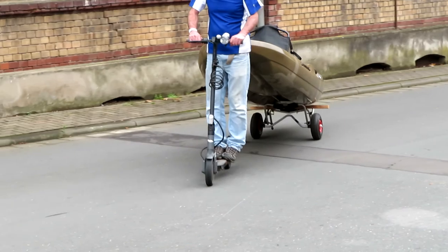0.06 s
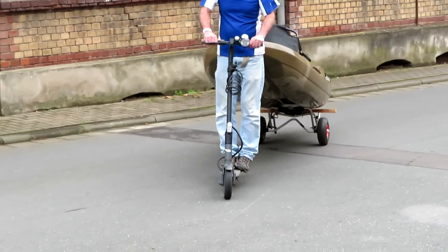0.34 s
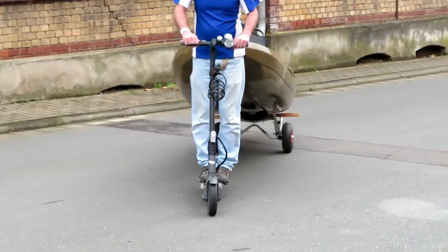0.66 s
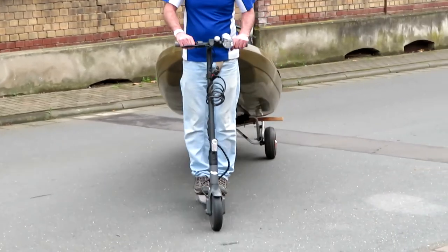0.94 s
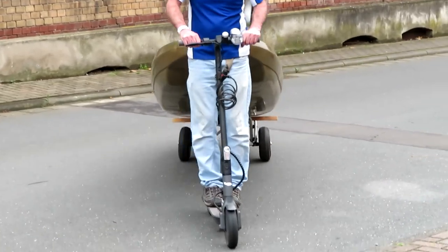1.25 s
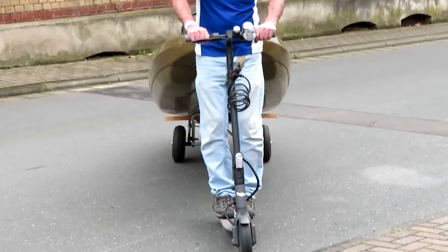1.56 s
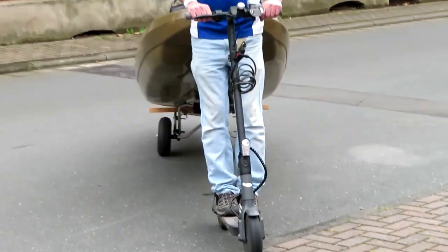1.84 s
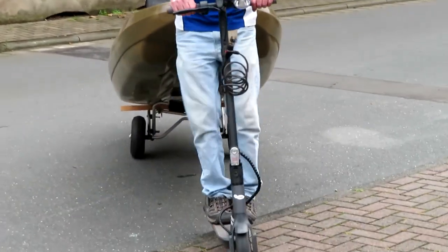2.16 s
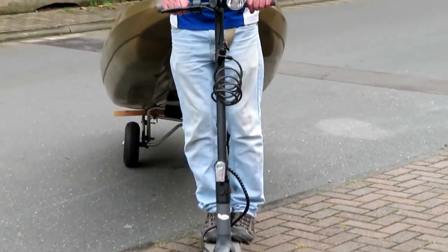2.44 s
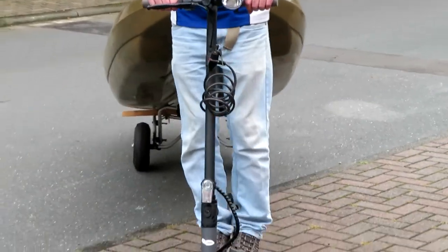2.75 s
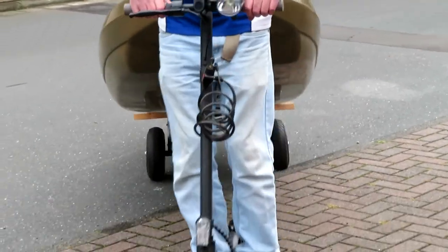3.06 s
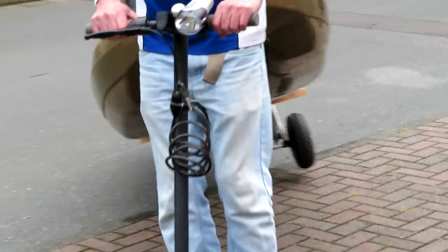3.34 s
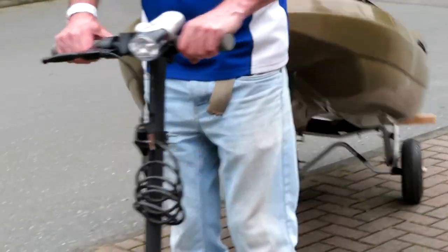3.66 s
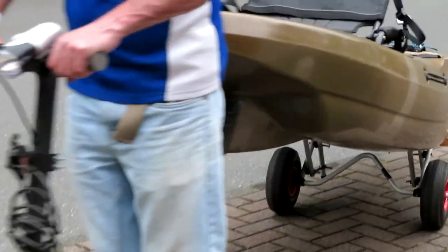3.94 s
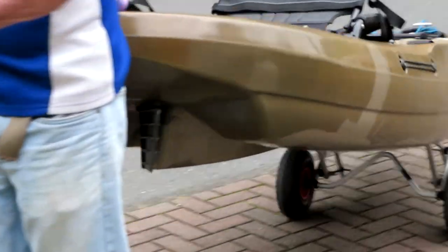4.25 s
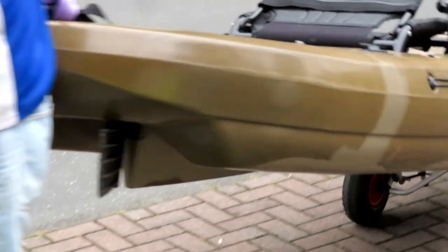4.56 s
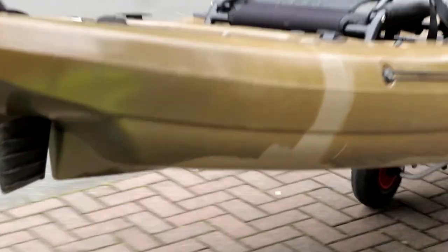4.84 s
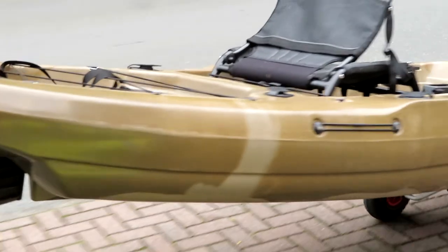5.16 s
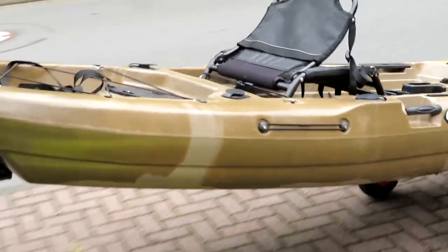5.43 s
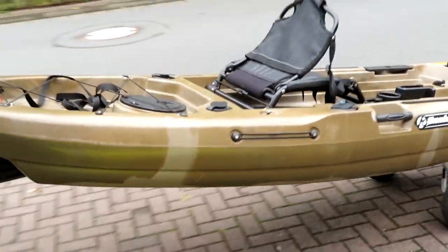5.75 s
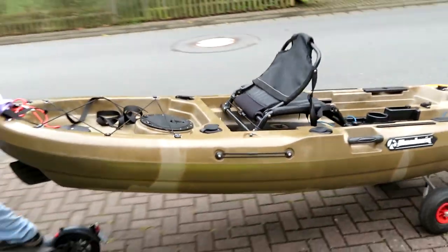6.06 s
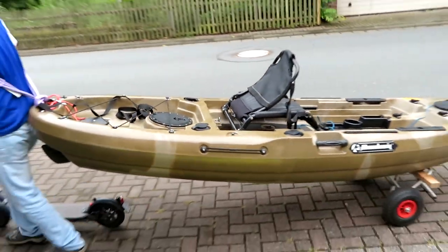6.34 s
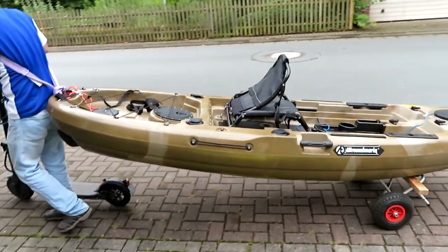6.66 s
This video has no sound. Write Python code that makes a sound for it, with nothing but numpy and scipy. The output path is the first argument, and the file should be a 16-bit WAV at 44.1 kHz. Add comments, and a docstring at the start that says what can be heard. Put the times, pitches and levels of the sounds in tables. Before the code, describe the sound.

Tyres rumble with a rhythmic rubbing tick, then a towed kayak and its cart thump and rattle loudly over a kerb and roll on slowly.

```python
"""Tyres hiss and a hollow hull drums: an electric scooter tows a plastic kayak on a two-wheeled cart.
The motor drive whines thinly, a wheel rubs on every turn, stones tick and the hitch creaks.
At a low kerb the tyres scrape and thump, the hull booms and bangs against the cart, and the cart's
crossbar knocks and its tubes clink. On block paving the rig slows to a creep, grit cracks under the
tyres, and a metal fitting snaps twice among the last knocks."""
import sys
import numpy as np
from scipy import signal
from scipy.fft import rfft, irfft, next_fast_len
from scipy.io import wavfile

SR = 44100
rng = np.random.default_rng(int(sys.argv[2]) if len(sys.argv) > 2 else 0)


def pcm_store(signal):
    """Save signal as 16-bit PCM."""
    levels = np.round(np.clip(np.atleast_2d(signal), -1, 1) * 32767)
    wavfile.write(sys.argv[1], SR, levels.astype(np.int16).T)


N = 299875
TIME = np.arange(N) / SR
BLOW_TIME = TIME[:SR // 2]
ATTACK = int(.025 * SR)  # the opening samples that set a blow's level


def from_db(db):
    """Decibels to gain."""
    return 10 ** (np.asarray(db) / 20)


def rms_one(x):
    """Scale to unit rms."""
    return x / np.sqrt(np.mean(x ** 2) + 1e-20)


def in_time(rows):
    """Each column of an automation curve at every sample."""
    s, *columns = np.transpose(rows)
    return [np.interp(TIME, s, c) for c in columns]


def gain_at(points, hz):
    """Gain of an EQ curve, read on a log-frequency axis."""
    f, db = np.transpose(points)
    return from_db(np.interp(np.log(hz + 1), np.log(f), db))


def drift(rate):
    """Random wander of rms 1 that turns about rate times a second."""
    return rms_one(np.interp(TIME * rate, np.arange(N), rng.standard_normal(N)))


# stereo width of the noises: f/Hz, side against mid/dB
STEREO_WIDTH = [(40, -82), (170, -78), (350, -23.5), (700, -30), (1400, -14), (2800, -11), (5600, -1.5),
                (10000, 0.5), (14000, 4)]
def noise(spectrum):
    """Coloured stereo noise, wider in the treble, rolled off beyond its spectrum; mid rms 1."""
    size = next_fast_len(N)
    hz = np.fft.rfftfreq(size, 1 / SR)
    skirts = 1 / (1 + (hz / spectrum[-1][0] / 2) ** 4) / (1 + (spectrum[0][0] / 2 / (hz + 1)) ** 4)
    mid, side = rfft(rng.standard_normal((2, size))) * gain_at(spectrum, hz) * skirts
    mid = irfft(mid, size)[:N]
    side = irfft(side * gain_at(STEREO_WIDTH, hz), size)[:N]
    return (mid + side * np.array([[1], [-1]])) / np.std(mid)


def patchy(x, depth_db, size, swell_share=1):
    """Random flicker: bands swell and sink on their own; a small swell_share leaves mostly dips."""
    _, s, cells = signal.stft(x, SR, nperseg=size)
    blur = np.outer([1, 2, 1], [1, 2, 1])
    field = rms_one(signal.convolve2d(rng.standard_normal(cells.shape[1:]), blur, "same"))
    depth = np.interp(s, TIME, np.broadcast_to(depth_db, N))
    gain = from_db(depth * np.minimum(field, swell_share * field))
    return signal.istft(cells * gain / np.sqrt(np.mean(gain ** 2, axis=0)), SR, nperseg=size)[1][:, :N]


def decay(t60):
    """Fade of one blow: 60 dB in t60 seconds."""
    return np.exp(-np.log(1000) * BLOW_TIME / t60)


def dying(times, db, t60):
    """Envelope of blows whose energy adds up and dies away."""
    power = np.zeros(N)
    np.add.at(power, (np.asarray(times) * SR).astype(int), from_db(db) ** 2)
    return np.sqrt(signal.lfilter([1], [1, -from_db(-60 / (t60 * SR)) ** 2], power + 1e-20))


def soften(envelope, rise_s):
    """Round off the attacks of an envelope."""
    r = np.exp(-1 / (rise_s * SR))
    return signal.lfilter([1 - r], [1, -r], envelope)


def grains(per_s, t60, spread_db):
    """Envelope of random tiny contacts of uneven size; rms 1."""
    sizes_db = spread_db * np.minimum(rng.exponential(1, N), 2.5)
    born = rng.random(N) < per_s / SR
    return rms_one(soften(dying(TIME[born], sizes_db[born], t60), rise_s=0.00058))


def ring(force, modes):
    """A force sets modes (f/Hz, level/dB, t60/s) ringing, with alternating signs."""
    out = 0
    for k, (hz, db, t60) in enumerate(modes):
        r, w = from_db(-60 / (t60 * SR)), 2 * np.pi * hz / SR
        mode = signal.lfilter([0, np.sin(w)], [1, -2 * r * np.cos(w), r * r], force + 1e-18)
        out = out + (-1) ** k * from_db(db) * mode
    return out


def add(out, s, sound):
    """Mix a short sound in at time s."""
    start = int(s * SR)
    out[:, start:start + sound.shape[-1]] += sound[..., :N - start]


def narrowed(x, width_db):
    """Pull in the stereo image of a close sound."""
    centre = x.mean(axis=0)
    return centre + from_db(width_db) * (x - centre)


def to_the_right(x, lean_db):
    """Nudge a sound right: lean_db louder there, and a sample later on the left."""
    return np.array([np.roll(x[0], 1) * from_db(-lean_db / 2), x[1] * from_db(lean_db / 2)])


# colour of the tread hiss: f/Hz, level/dB
HISS_EQ = [(250, 6), (480, -2), (620, 3.5), (760, 1.5), (1050, 1), (1500, -4.5), (2000, -10), (2350, -10.5),
           (2900, -18), (4000, -21.5), (6000, -30.5), (10000, -38)]
def tyre_hiss(hiss_db, flicker_from_s=5.0, flicker_db=3.06):
    """Tread hiss; after flicker_from_s it flickers, with random dips in its bands and its level."""
    flickering = TIME > flicker_from_s
    hiss = patchy(noise(HISS_EQ), depth_db=np.where(flickering, 9, 3), size=1024, swell_share=.55)
    return hiss * from_db(hiss_db + flicker_db * flickering * drift(16))


# colour of the rumble on the street and on paving: f/Hz, level/dB
RUMBLE_STREET_EQ = [(15, -22), (28, -3), (42, -10.5), (55, 9), (68, -0.5), (90, 4.5), (118, -10.5),
                    (170, -42)]
RUMBLE_PAVING_EQ = [(15, -8), (28, -3), (40, -4.5), (52, 9), (68, -6.5), (90, -3.5), (118, -14), (170, -32)]
def wheel_rumble(db, paved, shake):
    """The rough road shakes the wheels, harder after a jolt."""
    rumble = np.sqrt(1 - paved) * noise(RUMBLE_STREET_EQ) + np.sqrt(paved) * noise(RUMBLE_PAVING_EQ)
    return rumble * np.hypot(from_db(db), from_db(-22) * shake)


# colour of the drumming hull on the street and on paving: f/Hz, level/dB
DRUM_STREET_EQ = [(85, 0), (130, -13), (185, 2.5), (240, 1), (300, -12), (400, -12.5), (500, -23),
                  (800, -57)]
DRUM_PAVING_EQ = [(85, -4.5), (130, -4), (185, -1), (250, -3.5), (320, -6), (400, -10), (500, -17),
                  (800, -79)]
def hull_drumming(db, paved, shake):
    """Road roughness and jolts make the hollow hull drum."""
    drum = np.sqrt(1 - paved) * noise(DRUM_STREET_EQ) + np.sqrt(paved) * noise(DRUM_PAVING_EQ)
    return patchy(drum, depth_db=3.5, size=2048) * np.hypot(from_db(db), from_db(-13.5) * shake)


# colour of fine sand: f/Hz, level/dB
SAND_EQ = [(2000, -6), (4000, 5), (5500, 7.5), (8000, 1.5), (10000, -3.5), (13000, -43), (15500, -27)]
def sand(hiss_db, paved, shake, bed_db=-64.5, follow=0.57):
    """Fine grit follows the tyre hiss and the jolts, and crunches in the joints of the paving."""
    sizzle = from_db(0.44 * drift(200)) * noise(SAND_EQ)
    crunch = np.sqrt(paved) * grains(per_s=70, t60=0.061, spread_db=6.0) * from_db(hiss_db - 26)
    bed = from_db(bed_db + follow * (hiss_db - hiss_db.mean()))
    return sizzle * np.hypot(np.hypot(bed, crunch), from_db(-46.5) * shake)


# colour of a clack on the hull: f/Hz, level/dB
CLACK_EQ = [(500, 5), (850, 5), (1300, 0.5), (2000, 0), (2500, -5), (3500, -5.5), (5000, -24.5),
            (9000, -27), (15000, -46)]
def gear_rattle(hiss_db, shake):
    """Seat, straps and fittings tap lightly on the hull, and harder after every jolt."""
    taps = grains(per_s=90, t60=.05, spread_db=2.2) * noise(CLACK_EQ)
    taps = patchy(taps, depth_db=1.5, size=512)
    return taps * np.hypot(from_db(hiss_db - 11), from_db(-24.5) * shake)


# rolling faders, as speed and distance change: t/s, rumble/dB, drumming/dB, hiss/dB
ROLL_FADERS = [(0, -44, -33.5, -37), (0.75, -36.5, -30, -35.5), (1.0, -41.5, -37, -37.5),
               (2.25, -34, -34, -36.5), (2.55, -38.5, -43.5, -36.5), (3.05, -36, -33.5, -36.5),
               (3.9, -36, -31, -38.5), (4.1, -30, -26, -34.5), (4.45, -36, -38, -44), (4.6, -35, -31, -35),
               (4.78, -27.5, -33.5, -36), (4.93, -37, -36, -36.5), (5.0, -35, -33, -40.5),
               (5.15, -33, -34, -45), (5.53, -29.5, -35.5, -40.5), (5.65, -32, -34.5, -47),
               (5.87, -32, -39, -39.5), (5.98, -33.5, -37, -44.5), (6.15, -34.5, -34.5, -43.5),
               (6.5, -41, -36, -45), (6.8, -41, -37, -40.5)]
def rolling(shake, paving_s=3.23, crossfade_s=.5):
    """The bed of the moving rig, crossfading from street to block paving."""
    rumble_db, drum_db, hiss_db = in_time(ROLL_FADERS)
    paved = np.clip((TIME - paving_s) / crossfade_s, 0, 1)
    lows = wheel_rumble(rumble_db, paved, shake) + hull_drumming(drum_db, paved, shake)
    return lows + tyre_hiss(hiss_db) + sand(hiss_db, paved, shake) + gear_rattle(hiss_db, shake)


# fader of the motor drive: t/s, level/dB
WHINE_FADER = [(0, -67), (0.75, -67), (0.85, -74), (1.39, -70), (1.48, -58), (1.68, -67), (2.2, -63),
               (2.85, -57), (2.98, -51), (3.08, -51.5), (3.2, -61), (3.4, -63), (3.5, -76), (4.2, -72),
               (4.28, -66), (4.62, -61), (5.03, -58), (5.29, -70)]
def motor_whine(pitch_hz=15165, waver_hz=42, fringe_db=-12, fringe_hz=130):
    """The drive switches at a very high, wavering pitch with a rough fringe, until the throttle shuts."""
    db, = in_time(WHINE_FADER)
    phase = 2 * np.pi * np.cumsum(pitch_hz + waver_hz * drift(300)) / SR
    powered = np.clip((WHINE_FADER[-1][0] - TIME) / .04, 0, 1)
    rough = 1 + from_db(fringe_db) * drift(2 * fringe_hz)
    return powered * from_db(db) * rough * np.sin(phase + np.array([[.7], [-.7]]))


# colour of the open street: f/Hz, level/dB
STREET_EQ = [(350, 5.5), (1000, -3.5), (2000, -3.5), (4000, -12.5), (8000, -29.5)]
def street(db=-49):
    """A faint, even ambience, different at each ear."""
    return from_db(db) * np.array([noise(STREET_EQ).mean(axis=0) for _ in range(2)])


def scuffs(s, db, low_eq, high_eq, low_db, t60, tail_t60, tail_db, low_tail_db, rise_s):
    """Short gritty contacts in a low and a high band, with shifting colour and a faint tail."""
    high = np.hypot(dying(s, db, t60), dying(s, db + tail_db, tail_t60))
    low = np.hypot(dying(s, db + low_db, t60=0.026), dying(s, db + low_db + low_tail_db, t60=0.2))
    high, low = soften([high, low], rise_s)
    scuff = from_db(-6.0) * high * noise(high_eq) + low * noise(low_eq)
    return patchy(scuff * from_db(0.86 * drift(700)), depth_db=3.5, size=256)


# one rub per wheel turn: t/s, level/dB
WHEEL_TURNS = [(0.129, -23), (0.439, -23), (0.74, -24.5), (1.066, -26), (1.422, -24.5), (1.807, -23),
               (2.2177, -22.5), (2.668, -23)]
# catches within a rub: offset from the main catch/turns, level/dB
RUB_CATCHES = [(-.096, -9), (-.03, -5), (0, 0.5), (.025, -8.5), (.055, -8.5), (.1, -19)]
# low and high band of the rub: f/Hz, level/dB
RUB_LOW_EQ = [(700, 5), (1100, 2), (1550, 4.5), (1850, -5.5), (2200, 3.5), (2700, -12), (3400, -15.5),
              (4200, -21), (6000, -22)]
RUB_HIGH_EQ = [(2500, 9.5), (4200, 3), (5400, 7.5), (6500, 1.5), (7400, -3.5), (8900, -4), (9900, 1.5),
               (11200, -8), (13000, -5), (14500, -11), (16000, -11)]
def wheel_rub():
    """The same run of sharp catches comes on every turn, drawn out as the wheel slows."""
    periods = np.gradient([s for s, _ in WHEEL_TURNS])
    catches = [(s + offset * period, db + catch_db)
               for (s, db), period in zip(WHEEL_TURNS, periods) for offset, catch_db in RUB_CATCHES]
    return scuffs(*np.transpose(catches), RUB_LOW_EQ, RUB_HIGH_EQ, low_db=0.5,
                  t60=0.024, tail_t60=0.23, tail_db=-11.5, low_tail_db=-9.0, rise_s=0.0013)


# lone ticks: t/s, level/dB
TICK_CUES = [(0.2196, -30.5), (0.652, -27.5), (0.774, -27), (1.8903, -25.5), (2.0592, -34), (2.8003, -32),
             (3.603, -24.5), (3.99, -26.5), (4.008, -29), (4.069, -23.5), (4.101, -32), (4.134, -28),
             (4.195, -24.5), (4.3854, -29), (6.281, -36.5)]
# low band of ticks and scrapes, and high band of ticks: f/Hz, level/dB
STONE_LOW_EQ = [(600, 3), (1100, 6.5), (1550, -2.5), (1850, -9), (2200, 3), (2600, -11.5), (3400, -2),
                (4200, -11), (6000, -18)]
TICK_HIGH_EQ = [(2500, 10.5), (4200, 4), (5300, 2.5), (6500, -1), (7400, -6.5), (8900, -5.5), (9900, -2.5),
                (11200, -9), (13000, -18), (13900, -12), (14900, -25), (16000, -14)]
def ticks():
    """Stones and fittings tick, short and thin."""
    return scuffs(*np.transpose(TICK_CUES), STONE_LOW_EQ, TICK_HIGH_EQ, low_db=-5.5,
                  t60=0.039, tail_t60=0.36, tail_db=-13.5, low_tail_db=-10.0, rise_s=0.001)


def hull_blows(times, levels_db, tops_hz, spectrum, modes, t60, rise_s, wash_db, tail_db):
    """One register of the hull: clear modes, struck anew by each blow, over a fast-dying noise wash."""
    hz, mode_db, mode_t60 = np.transpose(modes)
    rings = np.sin(2 * np.pi * hz[:, None] * BLOW_TIME) * decay(mode_t60[:, None])
    fade = decay(t60) + from_db(tail_db) * decay(0.46)
    dense, out = noise(spectrum), np.zeros((2, N))
    for s, db, top_hz in zip(times, levels_db, tops_hz):
        strengths = from_db(mode_db + rng.normal(0, 2.0, len(hz))) * rng.choice([-1, 1], len(hz))
        clear = strengths @ rings / np.linalg.norm(strengths)
        wash = dense.take(int(s * SR) + np.arange(len(fade)), axis=1, mode="wrap") * fade
        blow = clear + from_db(wash_db) * wash / np.std(wash[:, :ATTACK])
        blow = blow * (1 - np.exp(-BLOW_TIME / rise_s))  # the plastic gives before it rings
        blow = signal.lfilter(*signal.butter(2, top_hz, fs=SR), blow)  # a softer contact is duller
        add(out, s, from_db(db) * blow / np.std(blow[:, :ATTACK]))
    return out


def struck_notes(times, levels_db, pitches_hz, t60, rise_s):
    """Each blow sets the spot that it lands on swinging at its own pitch."""
    out = np.zeros((2, N))
    envelope = decay(t60) * (1 - np.exp(-BLOW_TIME / rise_s))
    for s, db, hz in zip(times, levels_db, pitches_hz):
        note = envelope * np.sin(2 * np.pi * hz * BLOW_TIME)
        add(out, s, from_db(db) * note / np.std(note[:ATTACK]))
    return out


CONTACT_HZ = 2430  # low-pass corner of a blow of neutral hardness
# modes of the kayak on its cart: f/Hz, level/dB, t60/s
HULL_MODES = [(88, -4.5, 0.46), (136.5, -7.5, 0.58), (171.4, 1, 0.2), (218, -9, 0.2), (245, -2, 0.16),
              (303, 1.5, 0.48), (335, 3, 0.23), (364.5, 5.5, 0.11), (391.6, 2, 0.26), (456.3, 2, 0.25),
              (500, -2, 0.11), (606, -6.5, 0.23), (830, -12, 0.05), (916, -10, 0.072), (1190, -18, 0.18),
              (1270, 22, 0.035), (1414, 12, 0.12), (1720, -4, 0.058), (1900, -20, 0.075), (2350, -6, 0.044),
              (2444, 20, 0.034), (2930, 17, 0.037)]
# hull hits: t/s, level/dB, hardness (clack against body)/dB, panel note/Hz
KNOCK_CUES = [(0.513, -30, -10, 240), (0.669, -31.5, -19, 286), (2.666, -42, 6.5, 420),
              (3.069, -14.5, -6, 349), (3.113, -29, -8, 332), (3.154, -31.5, 1, 352),
              (3.189, -24, -7.5, 312), (3.250, -14.5, -2, 290), (3.281, -21.5, -9, 320),
              (3.312, -20.5, -30, 318), (3.338, -24.5, -7.5, 298), (3.358, -11.5, -12.5, 380),
              (3.367, -16.5, -12, 433), (3.388, -26, -21, 404), (3.422, -20.5, -15, 413),
              (3.574, -36, -2.5, 350), (3.653, -16, -7.5, 384), (3.665, -28, -3, 395),
              (3.685, -27, -5, 420), (3.697, -26, -12, 400), (3.712, -22.5, -4, 366),
              (3.726, -24, -14, 445), (3.747, -23, -6, 336), (3.757, -18, -1.5, 382),
              (3.772, -18, -28, 394.6), (3.790, -33, -10, 366), (3.808, -37, -2, 320), (3.863, -53, 4, 374),
              (3.942, -32.5, -1.5, 383), (4.175, -29, -7, 385), (4.197, -27, -0.5, 420),
              (4.207, -20.5, -23, 356), (4.256, -20, -2.5, 460), (4.272, -19.5, -17, 380),
              (4.290, -43, 2, 397), (4.335, -31.5, -2.5, 415), (4.353, -22.5, -4, 329),
              (4.364, -26.5, -26, 384), (4.387, -22.5, -9, 458), (4.487, -30.5, -11.5, 394),
              (5.13, -41, -22, 345), (5.166, -47, -28, 307), (5.543, -35.5, -5, 486),
              (5.926, -32, -31, 376), (6.059, -40, -4, 291)]
# chatter before the parts settle: delay/s, level/dB
KNOCK_CHATTER = [(0, -0.5), (0.0035, -10.5), (0.013, -23)]
# colour of a knock's body: f/Hz, level/dB
BODY_EQ = [(190, -25), (280, -8), (370, 4.5), (480, -11), (610, -4.5), (760, -8), (1200, -28)]
def hull_knocks(hardness_db_per_octave=10):
    """The hull hits the cart with a woody body and a chattering clack; harder hits are brighter."""
    s, db, hardness_db, panel_hz = np.transpose(KNOCK_CUES)
    tops_hz = np.clip(CONTACT_HZ * 2 ** (hardness_db / hardness_db_per_octave), 800, 12000)
    body = hull_blows(s, db - 4.5, tops_hz, BODY_EQ, HULL_MODES[4:12],
                      t60=0.12, rise_s=0.00073, wash_db=-7.5, tail_db=-14.0)
    body += struck_notes(s, db - 4, panel_hz, t60=0.14, rise_s=0.00055)
    contacts = [(at + delay, level + loss_db, top_hz)
                for at, level, top_hz in zip(s, db + hardness_db, tops_hz)
                for delay, loss_db in KNOCK_CHATTER]
    clack = hull_blows(*np.transpose(contacts), CLACK_EQ, HULL_MODES[12:],
                       t60=0.024, rise_s=0.0007, wash_db=-2.5, tail_db=-22.5)
    return (to_the_right(narrowed(body, width_db=-18), lean_db=0.2)
            + to_the_right(narrowed(clack, width_db=-6), lean_db=1.8))


# drops over seams, kerb and joints: t/s, level/dB, thump against boom/dB, boom note/Hz
BUMP_CUES = [(0.513, -31, -15, 235), (0.654, -24.5, -12, 188), (0.668, -18.5, -8, 181),
             (3.07, -19.5, -3, 238), (3.09, -22, 8, 204), (3.108, -21, -3, 138), (3.152, -19, -12, 169),
             (3.213, -18.5, 3, 214), (3.251, -14, -5, 239), (3.323, -15, -14, 204), (3.336, -13, -16, 164),
             (3.385, -33, -8, 220), (3.465, -31.5, 11, 180), (3.655, -17, -16, 214),
             (3.685, -17.5, -3, 186), (3.707, -15.5, 2, 237), (3.73, -13.5, -8, 168),
             (3.942, -25.5, -4.5, 201), (4.303, -22.5, -6, 172), (4.345, -32.5, 9, 191),
             (4.489, -27, -10, 199), (4.608, -24.5, 1, 185), (5.07, -25, -4, 195), (5.119, -28.5, -14, 290),
             (5.164, -28, -17, 240), (5.185, -31, -18, 312), (5.246, -31, -12, 200),
             (5.358, -33.5, 6.5, 270), (5.542, -30.5, -6, 201), (5.64, -30.5, -8, 230),
             (6.067, -29, -14, 263), (6.14, -30.5, -4, 169), (6.22, -29, -3, 222)]
# colour of the hull's boom: f/Hz, level/dB
BOOM_EQ = [(85, -26), (130, 0), (175, -2.5), (250, 0.5), (380, -14.5)]
def bumps(tyre_hz=85.6):
    """A tyre thuds and bounces on its air, and the hollow hull answers with a boom."""
    s, db, thump_db, boom_hz = np.transpose(BUMP_CUES)
    tops_hz = np.full(len(s), CONTACT_HZ)
    thud = hull_blows(s, db + thump_db - 3, tops_hz, RUMBLE_STREET_EQ, HULL_MODES[:1],
                      t60=0.032, rise_s=0.0043, wash_db=2.0, tail_db=-23)
    bounce = struck_notes(s, db + thump_db - 10.5, np.full(len(s), tyre_hz), t60=.12, rise_s=.004)
    boom = hull_blows(s, db - 8, tops_hz, BOOM_EQ, HULL_MODES[1:4],
                      t60=0.042, rise_s=0.00078, wash_db=2.0, tail_db=-13.5)
    boom += struck_notes(s, db - 3, boom_hz, t60=0.12, rise_s=0.0037)
    return narrowed(thud + bounce + boom, width_db=-24)


def shaking(t60=0.78):
    """How hard the rig shakes: every bump and knock adds to it, and it dies away."""
    s, db, *_ = np.transpose(BUMP_CUES + KNOCK_CUES)
    return soften(dying(s, db, t60), rise_s=0.0097)


# tyre scrapes: t/s, level/dB
SCRAPE_CUES = [(0.706, -33), (0.748, -38), (3.061, -27), (3.0667, -19), (3.114, -25), (3.148, -21),
               (3.245, -22.5), (3.462, -26), (3.648, -22), (3.704, -21), (3.721, -24), (4.349, -28.5),
               (4.383, -43)]
# high band of a scrape: f/Hz, level/dB
SCRAPE_HIGH_EQ = [(2500, 9), (4000, 11), (6500, 1), (9000, -8.5), (12000, -8.5), (16000, -30)]
def tyre_scrapes():
    """The tyres scrape over grit and the kerb, with a long gritty tail."""
    scrapes = scuffs(*np.transpose(SCRAPE_CUES), STONE_LOW_EQ, SCRAPE_HIGH_EQ, low_db=2.5,
                     t60=0.027, tail_t60=0.51, tail_db=-8.5, low_tail_db=-8.5, rise_s=0.0019)
    return to_the_right(narrowed(scrapes, width_db=-3.5), lean_db=0)


def press(s, length_s):
    """Half-sine swell of pressure, starting at time s."""
    return np.sin(np.pi * np.clip((TIME - s) / length_s, 0, 1))


# creaks of the hitch: t/s, level/dB, length/s
CREAK_CUES = [(1.697, -32.5, 0.013), (1.7106, -25, 0.016), (1.74, -35.5, 0.025), (1.897, -36, 0.0092),
              (2.013, -39.5, 0.017), (2.105, -36, 0.021)]
# modes of the hitch: f/Hz, level/dB, t60/s
HITCH_MODES = [(546, 0.5, 0.065), (644, 0, 0.026), (1210, -1, 0.008), (1630, -6, 0.014), (2080, -1, 0.029),
               (2340, -3.5, 0.0085), (2960, 0.5, 0.013), (3660, -9, 0.021), (3910, -3.5, 0.0068)]
def hitch_creak(slips_per_s=290):
    """The hitch slips in quick uneven runs, each a short creak or clink."""
    pressure = sum(from_db(db) * press(s, length_s) for s, db, length_s in CREAK_CUES)
    slip_count = np.cumsum(slips_per_s * np.exp(0.35 * drift(300))) / SR
    slips = np.diff(np.floor(slip_count), prepend=0) + 0.074 * rng.standard_normal(N)
    return ring(slips * pressure, HITCH_MODES)


# crossbar hits: t/s, level/dB, note/Hz, note against hit/dB, note t60/s
CROSSBAR_CUES = [(1.717, -26.5, 564, 0.5, 0.11), (3.2505, -12, 624, -8, 0.035),
                 (3.358, -14.5, 501, -4, 0.075), (3.653, -19, 630, -12, 0.076),
                 (4.257, -22, 612, -11, 0.06), (5.5415, -31, 904, -6, 0.031), (5.544, -40, 1226, 1, 0.11),
                 (5.9211, -39.5, 860, 3, 0.014), (5.9266, -39, 488, 9, 0.019),
                 (6.325, -37.5, 1180, -0.5, 0.023)]
# colour of the wood: f/Hz, level/dB
WOOD_EQ = [(330, 4), (440, 11), (540, 1), (660, 7), (850, -21), (1000, -9), (1250, -18), (1500, -2),
           (2200, -14), (3000, -28)]
def crossbar_knocks(t60=0.028):
    """The cart's wooden crossbar knocks drily, with a hollow note that the load damps more or less."""
    s, db, *_ = np.transpose(CROSSBAR_CUES)
    blow = soften(np.hypot(dying(s, db, t60), dying(s, db - 13, t60=0.093)), rise_s=0.0009)
    notes = sum(struck_notes([at], [level + note_db], [hz], note_t60, rise_s=0.001)
                for at, level, hz, note_db, note_t60 in CROSSBAR_CUES)
    return to_the_right(narrowed(blow * noise(WOOD_EQ), width_db=-4) + notes, lean_db=0.5)


# clinks of the cart frame: t/s, level/dB, f/Hz, t60/s
CLINK_CUES = [(3.721, -22, 3530, 0.028), (3.79, -22, 3600, 0.02), (3.81, -14.5, 1780, 0.025),
              (4.326, -24, 3400, 0.03)]
def frame_clinks():
    """Brief, dull metallic clacks, each strongest round the pitch of its tube."""
    out = np.zeros((2, N))
    for s, db, hz, t60 in CLINK_CUES:
        tube_eq = [(0.34 * hz, -9), (0.7 * hz, -9), (hz, 0), (1.13 * hz, -11), (1.35 * hz, -25)]
        out += soften(dying([s], db, t60), rise_s=0.00061) * noise(tube_eq)
    return out


# grit cracking on the paving: t/s, level/dB
POP_CUES = [(4.4892, -29), (4.555, -38), (4.64, -31), (4.716, -34), (4.732, -29.5), (4.762, -28),
            (4.786, -31.5), (4.869, -34), (4.888, -33), (4.910, -30), (4.924, -35), (4.948, -39),
            (5.022, -32), (5.120, -36), (5.340, -35), (5.452, -37), (5.473, -35), (5.518, -33),
            (5.528, -35), (5.858, -40), (6.088, -34), (6.145, -40), (6.433, -41)]
# colour of a crack: f/Hz, level/dB
POP_EQ = [(900, 7), (1600, 6), (2400, 4), (3800, -1.5), (5500, -14), (8500, -21), (12000, -30)]
def grit_pops(t60=0.032):
    """A grain bursts under a tyre in a short splintering crack."""
    burst = soften(dying(*np.transpose(POP_CUES), t60), rise_s=0.0011)
    splinters = from_db(-3.0 + 2.7 * drift(1500))
    return patchy(burst * splinters * noise(POP_EQ), depth_db=1.5, size=256)


# snaps of a metal fitting: t/s, level/dB
SNAP_CUES = [(5.5403, -23.5), (6.316, -20)]
# colour of the snap: f/Hz, level/dB
SNAP_EQ = [(500, 2), (1200, 2), (1800, -7), (2300, -8), (2900, -3), (4300, -15), (5300, -6), (6600, -12),
           (7800, -33), (9100, -48), (9800, -1.5), (10800, -24), (13700, -18), (15500, -26)]
# modes of the fitting: f/Hz, level/dB, t60/s
FITTING_MODES = [(1330, -3, 0.05), (2150, 0, 0.031), (2920, 1, 0.02), (5270, -11, 0.016),
                 (6250, -17, 0.018)]
def fitting_snaps(t60=0.027, bounce_s=0.013, bounce_db=-9):
    """A metal fitting snaps home, rings briefly and bounces once."""
    s, db = np.transpose(SNAP_CUES)
    contact = np.hypot(dying(s, db, t60), dying(s + bounce_s, db + bounce_db, t60=0.011))
    force = np.zeros(N)
    force[(s * SR).astype(int)] = from_db(db - 12.0)
    return from_db(-4.5) * contact * noise(SNAP_EQ) + ring(force, FITTING_MODES)


def fitting_squeak(start_s=6.276, length_s=0.022, db=-47, pitch_hz=5290, flutter_hz=40):
    """A faint, thin squeak of metal on metal just before the last snap."""
    phase = 2 * np.pi * np.cumsum(pitch_hz + flutter_hz * drift(500)) / SR
    return from_db(db) * press(start_s, length_s) * np.sin(phase + np.array([[.6], [-.6]]))


def scene():
    """The whole rig, close by in the open street."""
    bed = rolling(shaking()) + motor_whine() + street()
    wheels = wheel_rub() + ticks() + bumps() + tyre_scrapes() + grit_pops()
    load = hull_knocks() + hitch_creak() + crossbar_knocks() + frame_clinks()
    return bed + wheels + load + fitting_snaps() + fitting_squeak()


def record(dry, mono_below_hz=190, cutoff_hz=15750):
    """The bass is made mono; peaks clip at full scale; the very top is cut."""
    mid = dry.mean(axis=0)
    hz = np.fft.rfftfreq(N, 1 / SR)
    side = irfft(rfft(dry - mid) * (1 - 1 / (1 + (hz / mono_below_hz) ** 4)), N)
    low_pass = signal.ellip(10, .1, 80, cutoff_hz, fs=SR, output="sos")
    return signal.sosfilt(low_pass, np.clip(mid + side, -1, 1))


dry = scene()
out = record(dry)
pcm_store(out)
```